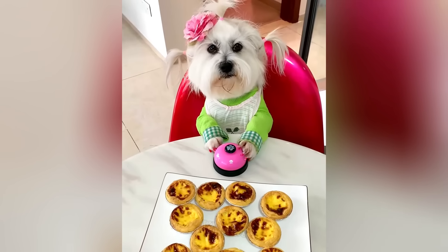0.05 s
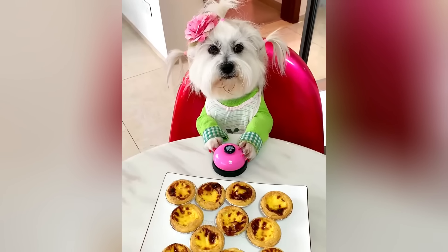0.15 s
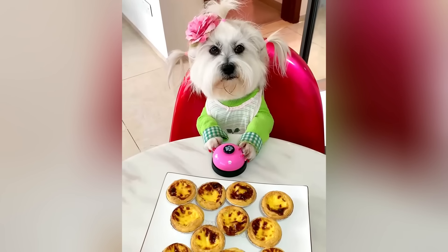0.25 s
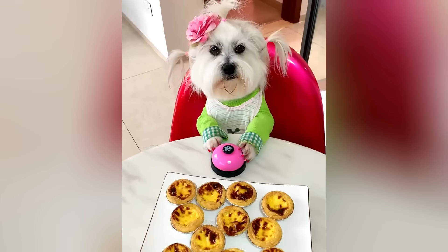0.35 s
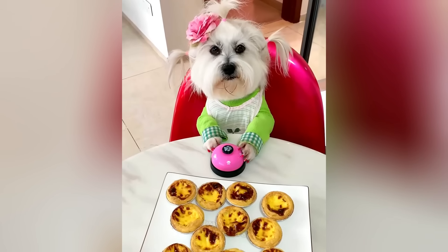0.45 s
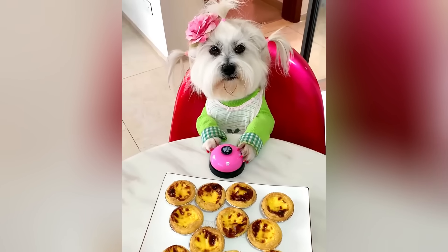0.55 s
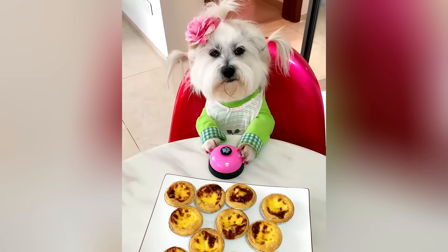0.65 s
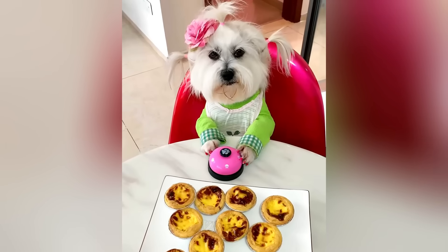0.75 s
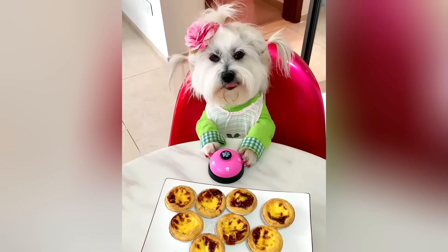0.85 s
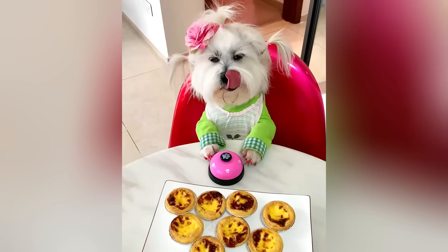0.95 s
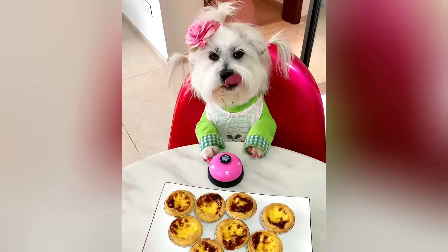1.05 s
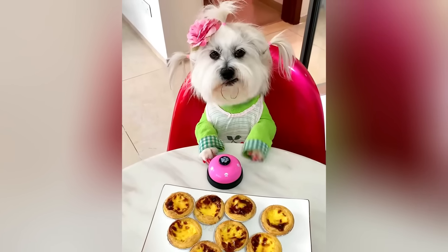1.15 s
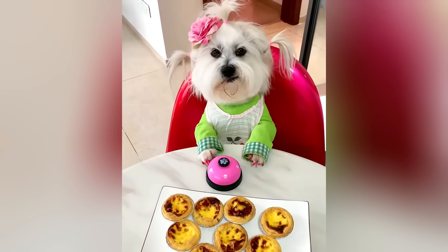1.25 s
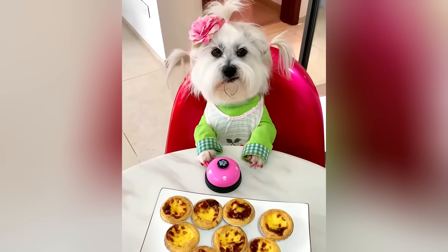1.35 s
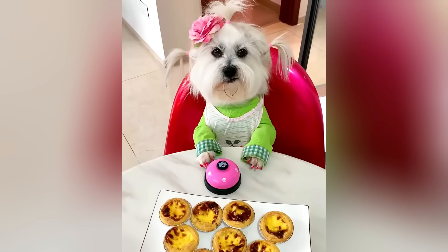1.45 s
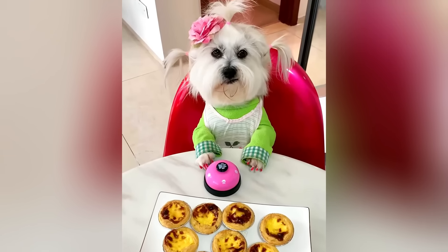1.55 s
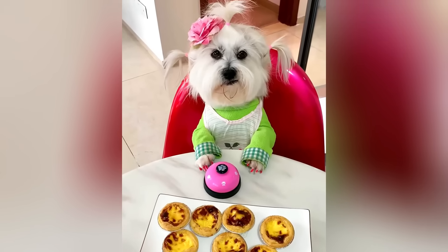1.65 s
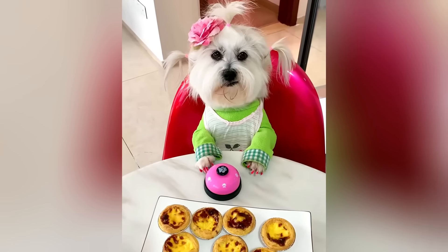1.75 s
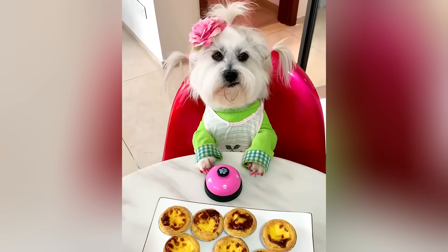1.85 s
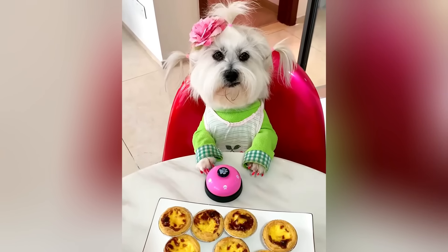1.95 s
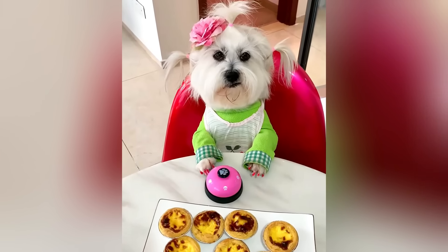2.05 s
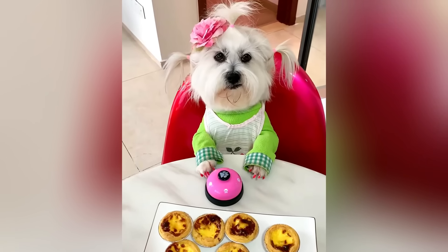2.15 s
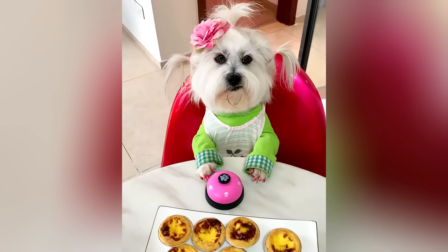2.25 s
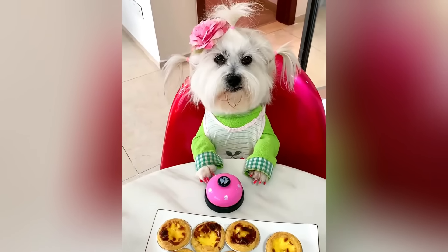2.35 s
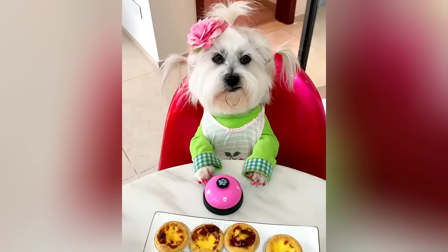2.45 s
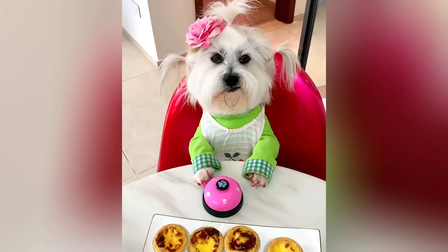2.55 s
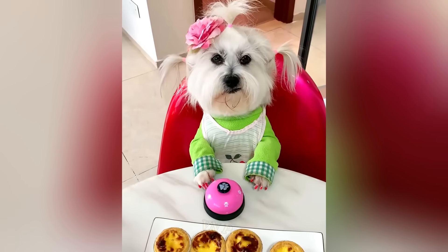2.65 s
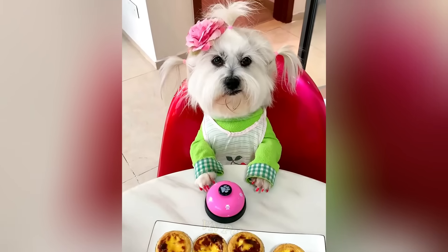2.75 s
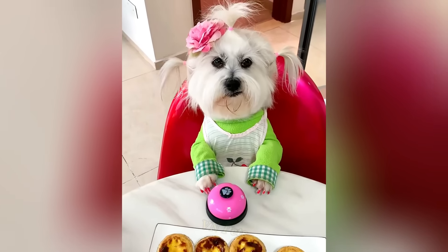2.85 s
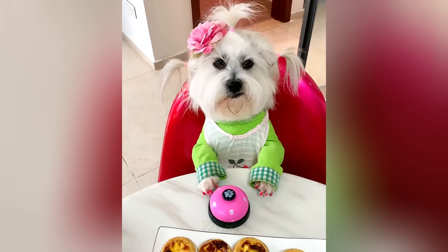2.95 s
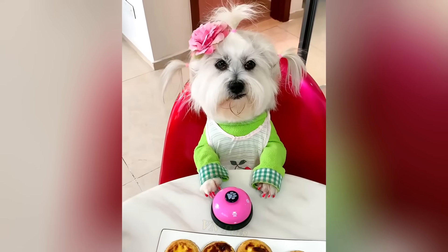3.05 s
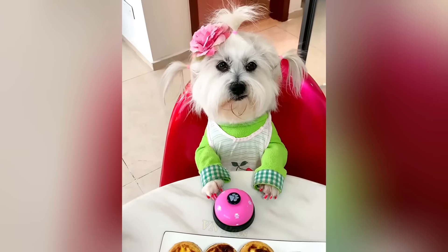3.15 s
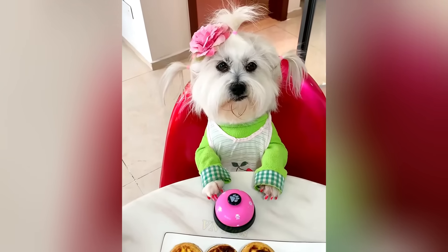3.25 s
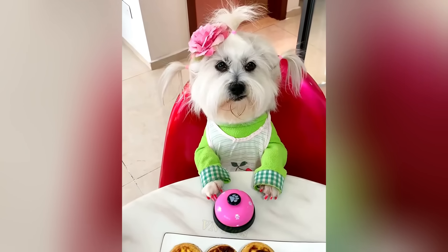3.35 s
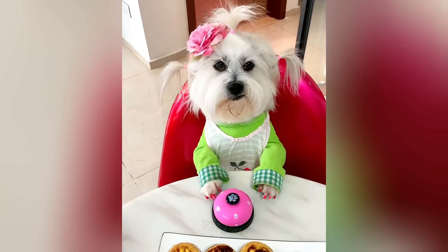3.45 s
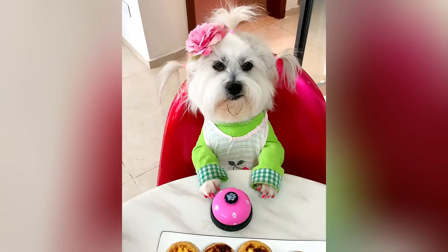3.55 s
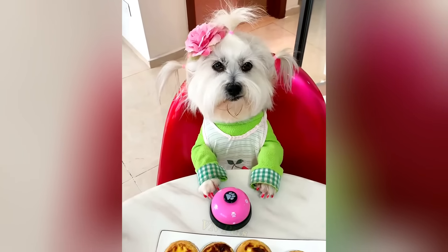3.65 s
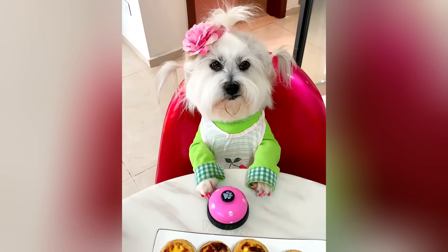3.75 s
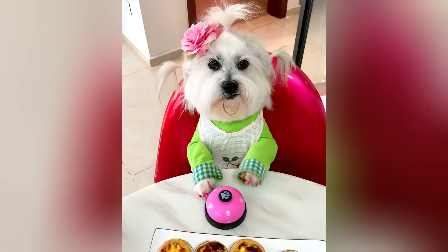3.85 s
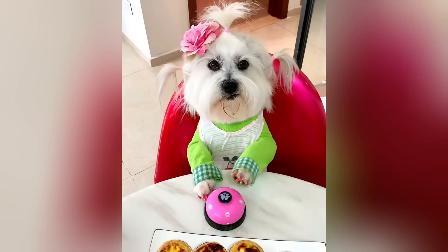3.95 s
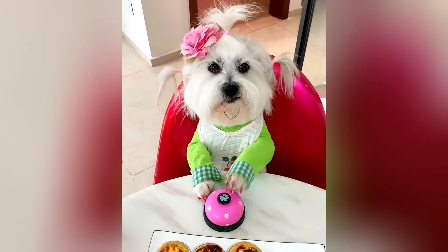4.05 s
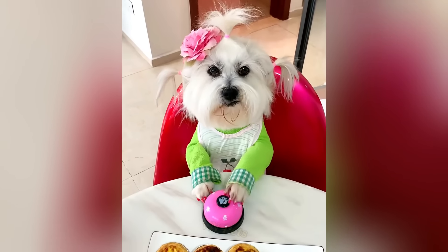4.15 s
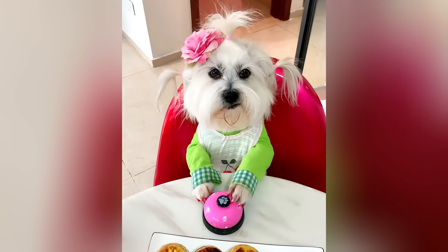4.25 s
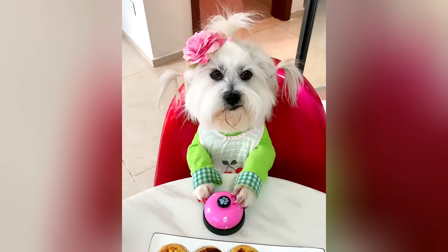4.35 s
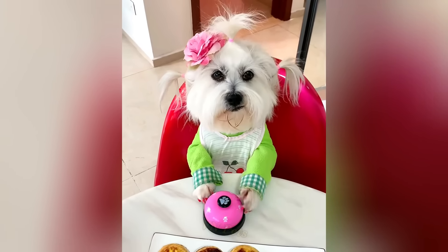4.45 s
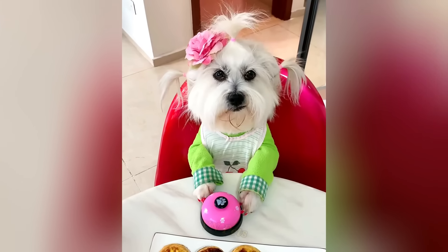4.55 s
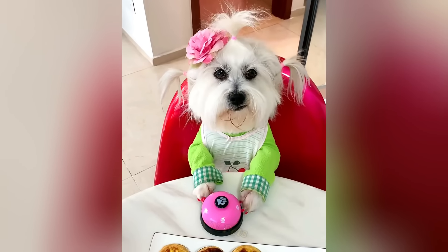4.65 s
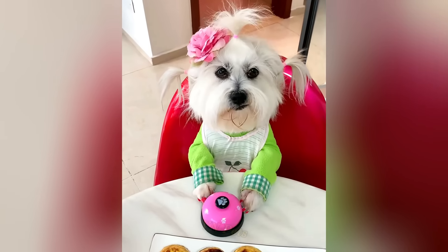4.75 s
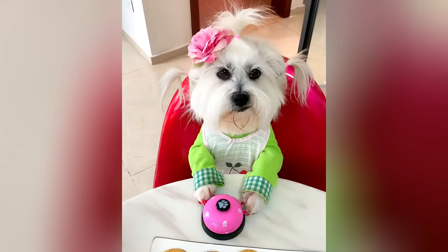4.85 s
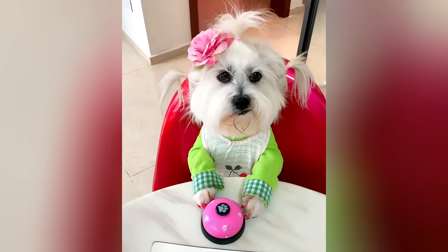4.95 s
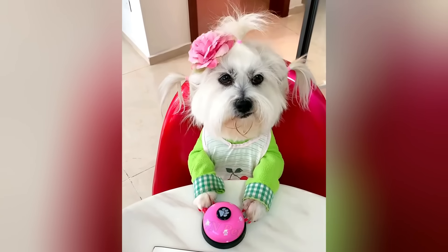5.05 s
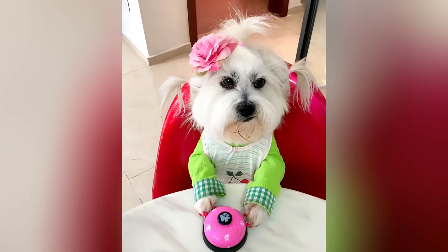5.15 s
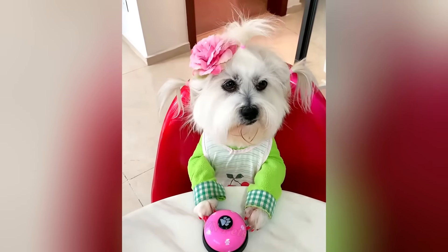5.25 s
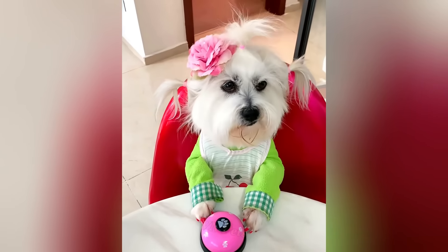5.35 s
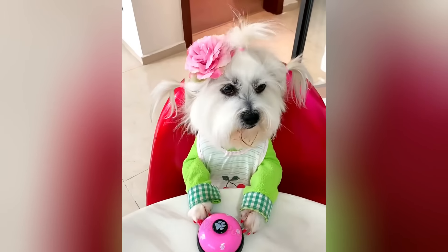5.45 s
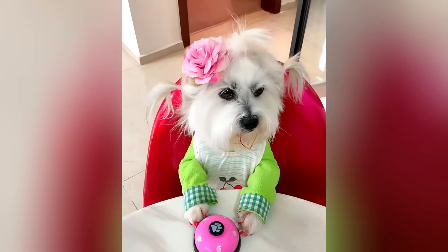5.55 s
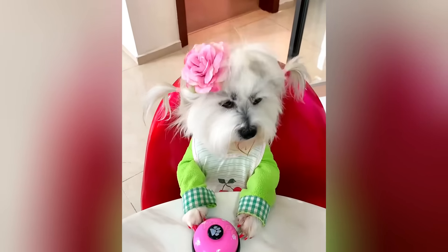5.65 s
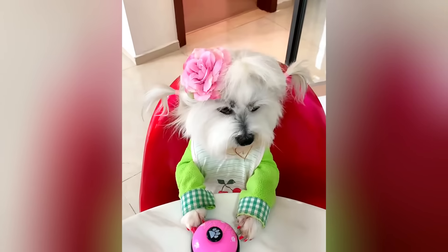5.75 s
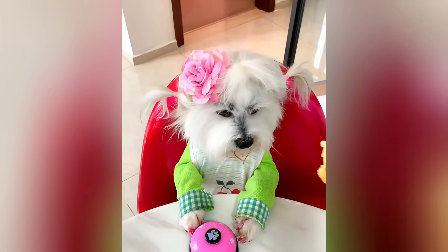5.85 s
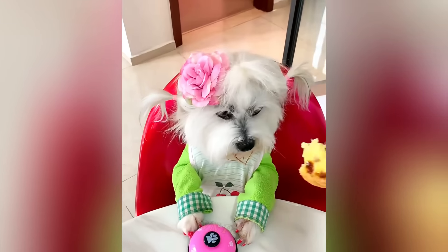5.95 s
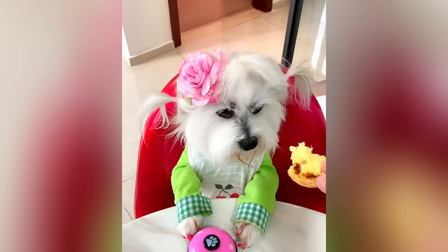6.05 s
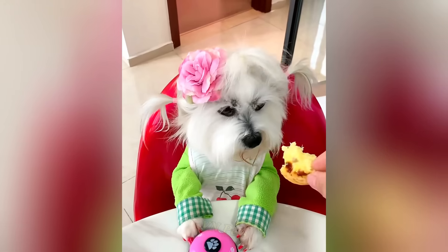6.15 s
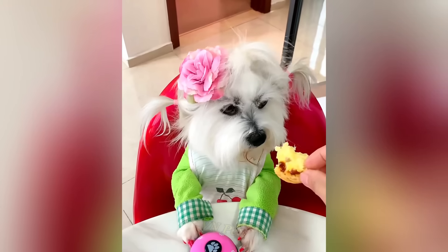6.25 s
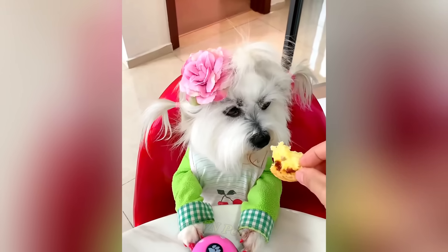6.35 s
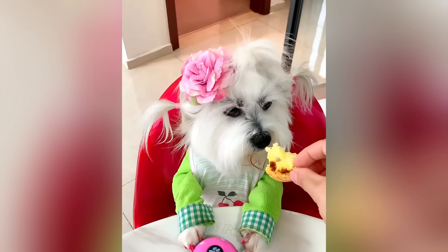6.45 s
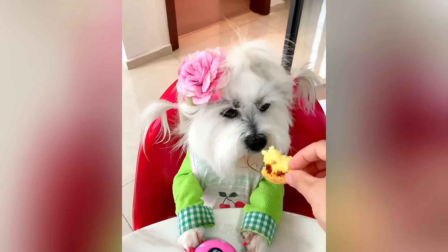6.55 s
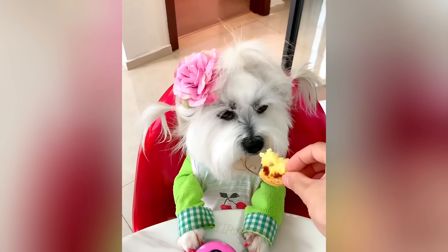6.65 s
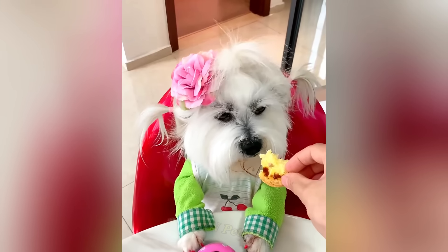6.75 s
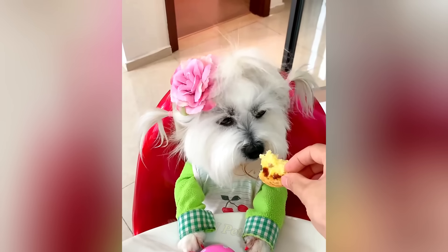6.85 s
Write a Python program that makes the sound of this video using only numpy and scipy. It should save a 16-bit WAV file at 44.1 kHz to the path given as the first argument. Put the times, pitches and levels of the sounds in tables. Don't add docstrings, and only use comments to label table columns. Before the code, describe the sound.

A small metal service bell is already ringing and slowly fades in a quiet room, then a plastic button clacks and it dings again.

```python
import sys
import numpy as np
from scipy import signal
from scipy.fft import rfft, irfft, next_fast_len
from scipy.io import wavfile
from scipy.ndimage import uniform_filter1d, map_coordinates

SR = 44100
rng = np.random.default_rng(int(sys.argv[2]) if len(sys.argv) > 2 else 0)


def store_pcm(level_fs):
    pcm = np.round(np.clip(level_fs, -1, 1) * 32767).astype(np.int16)
    wavfile.write(sys.argv[1], SR, np.atleast_2d(pcm).T)


def attenuation_scalar(level_db):
    decades = np.asarray(level_db, float) / 20
    return 10 ** decades


N = 305026

STRIKES_S = [
    -.3925,
    4.2775,
]
# (lower [Hz], upper [Hz], first beat silence after strike [s])
TWINS = [(1260.84, 1305.17, .0149), (3269.02, 3272.38, .027), (5890.86, 5897.18, .1197),
         (9115.9, 9125.1, .02), (12901, 12919.9, .12)]
# (level [dB], t60 [s], share missing at strike [0-1], swell [s], swell abruptness [-])
RING = [(-42.5, 8.2557, .95, 0.2, 2.0334), (-28.5, 5.9079, .9, .18, 1.3), (-24.5, 4.4764, 1, 0.13, 1.1),
        (-26, 4.3764, 1, .2, 1.7), (-15, 1.982, .75, 0.16, 2.1), (-31, 1.6, 0.91, .14, 3),
        (-12, 0.6717, 0.8, .1, .92), (-46, .6, .51, .12, 1.1), (-38, .4, 0.4, .05, 1.1),
        (-18.5, .38, 0.3, .03, 1.24)]
# (left-right level [dB], lead on the left [rad])
AIM = [(8.5, 0.2), (0.3218, .02), (1.4427, -0.012), (0.2926, -.13), (0.0316, 0.16), (1.2442, -.1),
       (0.1093, .02), (-4.5, .02), (2.5, .05), (1.5, .12)]
SUMS = [(0, 0, 1), (0, 1, 1), (1, 1, 1), (0, 2, -1), (0, 3, 1), (1, 2, -1), (1, 3, 1), (3, 5, 1), (0, 4, 1),
        (0, 5, -1)]
SUM_DB = [25, -10.5, -14, -8.5, 3.5, -22, -18, -14.5, -6, 8]
# (frequency [Hz], from [s], until
# [s])
FAINT = [(12092.5, .27, 3), (12230.7, .09, .32), (13360, .18, .32), (7695, .6, 1.1), (15320, 0, .06)]
# (level [dB], t60 [s])
FAINT_RING = [(-81, 6.3), (-75, 1.5), (-61.5, .6), (-69, 4.4), (-43.5, .15)]
# (frequency [Hz], level [dB])
TONE_FLOOR = [(7150, -75), (7700, -80), (12000, -95), (12900, -83)]
# (first edge [s], step [samples])
LEVEL_STEPS = (.0367, 2048)
# (time after strike [s], half width [s], loss of highs [0-1])
CLOCK_SKIP = (.6263, 0.00065, 0.37)
# (frequency [Hz], width [Hz], level [dB], half width [s])
SKIP_SMEAR = (5600, 650, -73, .024)
# (frequency [Hz], width [Hz], level [dB], t60 [s], swell [s])
HAZE = [(1454.1, 200, -69, 5, 0.42), (1967, 76, -81.5, 5.1, .15), (2600, 260, -80.5, 8.6, .08),
        (8945.3, 150, -56.5, 2.3, 0.74)]
# (frequency [Hz], density [dB/Hz])
HUSH = [(20, -15.5), (230, -22.5), (490, -27.5), (685, -24.5), (1500, -26), (12800, -29.5), (13300, -34.5),
        (15700, -37.5)]
# (frequency [Hz], correlation [0-1])
ALIKE = [(30, 0.9076), (120, 0.65), (500, 0.65), (3000, 0.66), (12000, 0.2)]
# (frequency [Hz], level [dB])
HUM = [(660, -99), (702, -99)]
# (margin [dB], fall above [dB/oct], fall below [dB/oct], most fall above [dB], scatter [dB])
MASK = (-34, 17, 60, 19, 4)
# (time from strike [s], knock [dB], knock length [s], bright click [dB])
CONTACTS = [(-.022, -48.5, .0043, -57.5), (-.014, -19.5, .0021, -21.5), (-.0117, -37, .0031, -33.5),
            (-.0098, -22, .0036, -28.5), (-.006, -40.5, 0.0028, -46), (-.0027, -14, 0.0014, -20.5),
            (-.001, -38.5, 0.0016, -29.5), (.0005, -17, .0014, -5), (.012, -41, 0.0024, -31.5),
            (.0172, -45, 0.003986, -42.5), (0.0605, -57.5, 0.002, -66.5)]
# (frequency [Hz], width [Hz], level [dB])
BUTTON = [(1846, 87, 5), (2300, 180, -9.5), (4640, 300, -12.5), (796, 900, -19.5), (149.74, 222.9, -16)]
# (frequency [Hz], density [dB/Hz])
CLICK = [(60, -25.5), (300, -12.5), (1500, -16.5), (4300, -6.5), (12500, -6.5), (15400, 1.5), (16200, -8.5),
         (17000, -57)]
# (level [dB], t60 [s])
ECHOES = [(-25.5, 0.028143), (-43, .13)]
# (time from strike [s], level [dB], length [s])
THUMP = (.0009, -41, .001)
OFFSET = [.00031, .00019]

SUM_SWELL_S, SHADOW_DB, FLOOR_SCATTER_DB = .06, -48.5, 3
HAZE_PATCHY_DB = 2.5
DRONE_HZ, DRONE_WIDTH_HZ, DRONE_DB = 58.913, 21, [-9.5, -14, -13.5]
FLOOR_DB, FLOOR_SAG_DB_PER_S, DUCK_DB, DUCK_S = -75, 1.1104, 7.5, 0.3
HUSH_TOP_HZ = 15750
KNOCK_HZ, PRESSED_HZ = 2031.2, 2306
SCRAPE_FROM_S, SCRAPE_DB, SCRAPE_RISE_DB_PER_S = -.013, -29, 3900.5
ECHO_GATE_S = .055
CEILING = .74


def unit(x):
    return x / np.sqrt(np.mean(x ** 2) + 1e-20)


def along(points, hz):
    f, v = np.transpose(points)
    return np.interp(np.log(hz + 1), np.log(f + 1), v)


def filtered(x, response):
    n = x.shape[-1]
    m = next_fast_len(n + 8192)
    return irfft(rfft(x, m) * response(np.fft.rfftfreq(m, 1 / SR)), m)[..., :n]


def flicker(tone, floor):
    frame = np.arange(len(tone)) // 1024

    def power(x):
        return np.bincount(frame, np.abs(x) ** 2 * np.ones(len(tone))) + 1e-20

    over_db = 10 * np.log10(power(tone) / power(floor))
    over_db += FLOOR_SCATTER_DB * rng.standard_normal(len(over_db))
    return tone * uniform_filter1d(1. * (over_db > 0)[frame], size=500)


def dome(t):
    skip_s, half_s, loss = CLOCK_SKIP
    clock = t + (np.tanh((t - skip_s) / half_s) - 1) / (2 * SR)
    blur = np.exp(-((t - skip_s) / half_s) ** 2)
    edge_s, size = LEVEL_STEPS
    stepped = edge_s + ((t - edge_s) * SR // size + .5) * size / SR
    stepped = uniform_filter1d(stepped, size=130)
    modes, shell, pans = [], [], []
    for k, (db, t60, missing, swell, abrupt) in enumerate(RING):
        hz, silent = TWINS[k // 2][k % 2], TWINS[k // 2][2]
        turn = hz * (clock - silent) + k % 2 / 2
        wave = np.exp(2j * np.pi * turn)
        age = np.where(t > edge_s, stepped, t) if hz > 10000 else t
        grow = 1 - np.clip(missing, 0, 1) * np.exp(-(t / swell) ** abrupt)
        grow *= 1 + 0.99 * (hz > 5000) * np.exp(-(t / 0.014) ** 2)
        gain = attenuation_scalar(db - 60 * age / t60) * grow * (1 - loss * min(hz / 5900, 1) ** 2 * blur)
        mode = gain * wave
        modes.append(flicker(mode, attenuation_scalar(along(TONE_FLOOR, hz))) if hz > 10000 else mode)
        shell.append(attenuation_scalar(db - 60 * t / t60) * wave)
        pan_db, lead_rad = AIM[k]
        pans.append(attenuation_scalar([pan_db / 2, -pan_db / 2]) * np.exp(.5j * lead_rad * np.array([1, -1])))
    ring = np.real(np.transpose(pans) @ modes)
    extra = sum_tones(t, shell, modes) + faint_modes(t, clock) + skip_noise(t, blur)
    return (ring + extra) * (1 - np.exp(-t / .0004))


def sum_tones(t, shell, modes):
    pitch = [hz for twins in TWINS for hz in twins[:2]]
    swell = 1 - np.exp(-(t / SUM_SWELL_S) ** 2)
    sums = {}
    for (a, b, sign), db in zip(SUMS, SUM_DB):
        khz = (pitch[a] + pitch[b]) // 1000
        sums[khz] = sums.get(khz, 0) + sign * attenuation_scalar(db) * shell[a] * shell[b] * swell
    floors = {4: attenuation_scalar(SHADOW_DB) * (modes[2] + modes[3]), 7: attenuation_scalar(TONE_FLOOR[0][1])}
    return sum((flicker(tone, floors[khz]) if khz in floors else tone).real for khz, tone in sums.items())


def faint_modes(t, clock):
    out = np.zeros(len(t))
    for (hz, start, end), (db, t60) in zip(FAINT, FAINT_RING):
        kept = uniform_filter1d(1. * (t >= start) * (t < end), size=600)
        tone = kept * attenuation_scalar(db - 60 * t / t60) * np.exp(2j * np.pi * hz * clock)
        out += flicker(tone, attenuation_scalar(along(TONE_FLOOR, hz))).real
    return out


def skip_noise(t, blur):
    tick = filtered(blur * rng.standard_normal(len(t)), lambda f: np.exp(-((f - 4200) / 3000) ** 2))
    hz, width_hz, db, half_s = SKIP_SMEAR
    smear = unit(filtered(rng.standard_normal(len(t)), lambda f: np.exp(-((f - hz) / width_hz) ** 4)))
    return attenuation_scalar(-46) * tick + attenuation_scalar(db) * np.exp(-((t - CLOCK_SKIP[0]) / half_s) ** 2) * smear


def haze(t):
    out = np.zeros(len(t))
    for hz, width, db, t60, swell in HAZE:
        band = filtered(rng.standard_normal(len(t)), lambda f: np.exp(-(2 * (f - hz) / width) ** 4))
        patches = map_coordinates(rng.standard_normal(len(t) // 1500 + 4), [np.arange(len(t)) / 1500])
        level_db = db - 60 * t / t60 + HAZE_PATCHY_DB * patches
        out += unit(band) * attenuation_scalar(level_db) * (1 - np.exp(-(t / swell) ** 2))
    return out


def hush():
    def colour(hz):
        drone = sum(attenuation_scalar(db) * np.exp(-((hz - k * DRONE_HZ) / DRONE_WIDTH_HZ) ** 2)
                    for k, db in enumerate(DRONE_DB, 1))
        return np.hypot(attenuation_scalar(along(HUSH, hz)), drone) * (hz > 8) * (hz < HUSH_TOP_HZ)

    def mid_side(hz):
        turn = np.arccos(np.clip(along(ALIKE, hz), -1, 1)) / 2
        return colour(hz) * [np.cos(turn), np.sin(turn)]

    t = np.arange(N) / SR
    age = t - np.where(t < STRIKES_S[1], *STRIKES_S)
    gain_db = FLOOR_DB - FLOOR_SAG_DB_PER_S * age - DUCK_DB * np.exp(-(age / DUCK_S) ** 2)
    mid, side = filtered(rng.standard_normal((2, N)), mid_side)
    hum = sum(attenuation_scalar(db) * np.sin(2 * np.pi * hz * t) for hz, db in HUM)
    return hum + attenuation_scalar(gain_db) * unit(np.array([mid + side, mid - side]))


def masked(weak, loud):
    margin_db, above_db, below_db, most_db, scatter_db = MASK
    hz, _, z = signal.stft(weak, SR, nperseg=2048)
    ring = np.abs(signal.stft(loud, SR, nperseg=2048)[2]) ** 2
    edges = np.geomspace(1000, 17000, 34)
    band = np.clip(np.searchsorted(edges, hz) - 1, 0, len(edges) - 2)
    member = band == np.arange(len(edges) - 1)[:, None]
    octaves = np.log2(edges[:-1, None] / edges[:-1])
    fall_db = np.where(octaves > 0, np.minimum(above_db * octaves, most_db), -below_db * octaves)
    spread = attenuation_scalar(-2 * fall_db)
    ratio = member @ np.abs(z[0]) ** 2 / (spread @ member @ ring + 1e-20)
    over_db = 10 * np.log10(ratio + 1e-20) - margin_db
    keep = (1 + np.tanh(over_db + scatter_db * rng.standard_normal(over_db.shape))) / 2
    kept = z * np.where(hz[:, None] > 2800, keep[band], 1)
    return signal.istft(kept, SR, nperseg=2048)[1][:, :N]


def plunger(t):
    knocks, clicks = np.zeros((2, len(t)))
    for s, knock_db, length, click_db in CONTACTS:
        hz = KNOCK_HZ if s < -.002 else PRESSED_HZ
        knocks += attenuation_scalar(knock_db) * np.exp(-(2.6 * (t - s) / length) ** 2) * np.cos(2 * np.pi * hz * (t - s))
        age = np.maximum(t - s + 0.00014, 0)
        clicks += (age > 0) * attenuation_scalar(click_db - 60 * age / 0.0069) * rng.standard_normal(len(t))
    slide = attenuation_scalar(SCRAPE_DB + SCRAPE_RISE_DB_PER_S * np.minimum(t - SCRAPE_FROM_S, 0))
    echo = sum(attenuation_scalar(db - 60 * np.abs(t) / t60) for db, t60 in ECHOES) * np.exp(-(t / ECHO_GATE_S) ** 4)
    mid, side = np.where(t < 0, slide, echo) * rng.standard_normal((2, len(t)))
    scrape = mid + attenuation_scalar(-16) * np.array([side, -side])

    def plastic(f):
        return sum((-1) ** k * attenuation_scalar(db) * 1j * f * width / (hz * hz - f * f + 1j * f * width)
                   for k, (hz, width, db) in enumerate(BUTTON))

    def bright(f):
        return attenuation_scalar(along(CLICK, f) + 5.0)

    when, db, length = THUMP
    thump = attenuation_scalar([[db - 0.2], [db + 4.1308]]) * np.exp(-((t - when) / length) ** 2)
    return knocks + thump + attenuation_scalar(-6.0) * filtered(scrape, plastic) + filtered(clicks + scrape, bright)


def ding():
    lead = SR // 10
    t = np.arange(-lead, 48 * lead) / SR
    out = np.zeros((3, len(t)))
    out[:2, lead:] = dome(t[lead:])
    out[2, lead:] = haze(t[lead:])
    out[:2, :3 * lead] += plunger(t[:3 * lead])
    return out


def scene():
    one, lead = ding(), SR // 10
    track = np.zeros((3, 3 * N))
    for s in STRIKES_S:
        track[:, N + round(s * SR) - lead:][:, :one.shape[1]] += one
    loud, weak = track[:2, N:2 * N], track[2, N:2 * N] + hush()
    return loud + masked(weak, loud[0])


def roll_off(x):
    return signal.sosfilt(signal.butter(12, 16990, fs=SR, output="sos"), x)


def record(dry):
    capped = dry / (1 + np.abs(dry / CEILING) ** 4) ** (1 / 4)
    return roll_off(capped + np.transpose([OFFSET]))


dry = scene()
out = record(dry)
store_pcm(out)
```